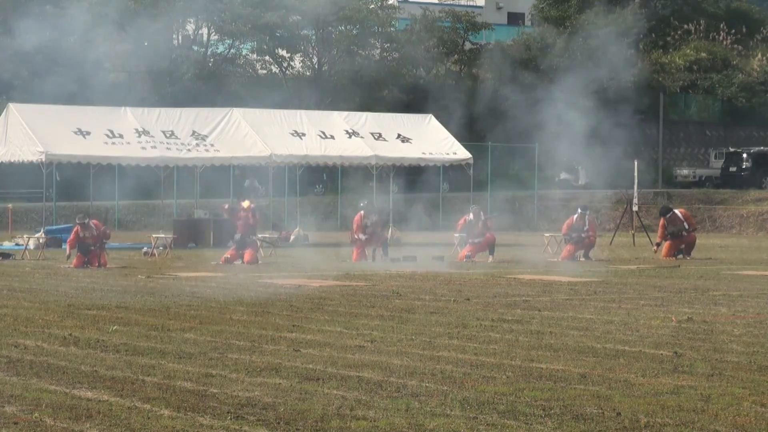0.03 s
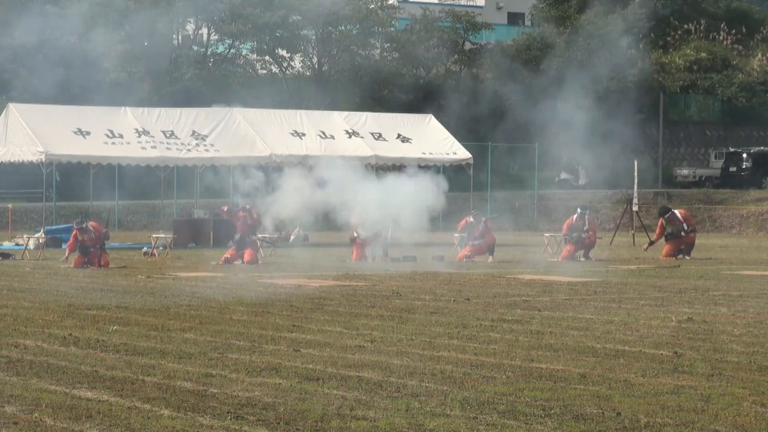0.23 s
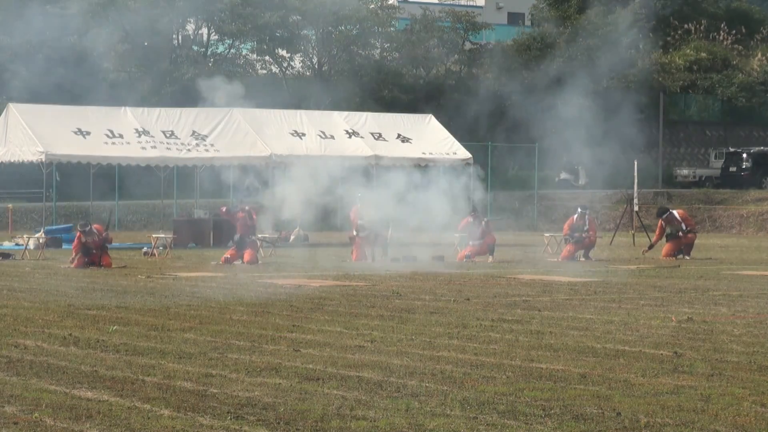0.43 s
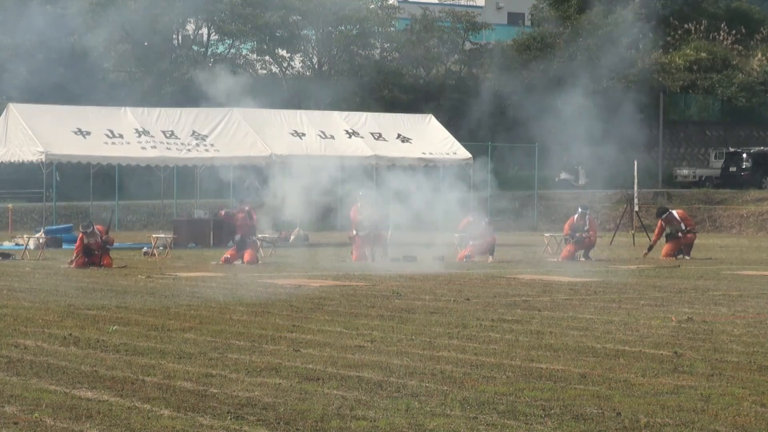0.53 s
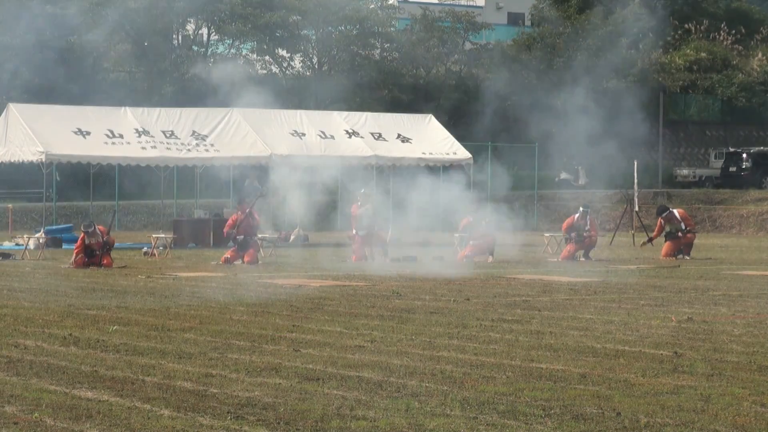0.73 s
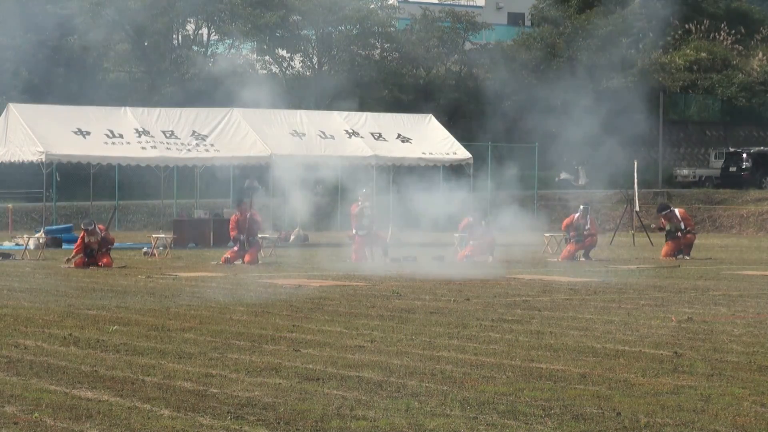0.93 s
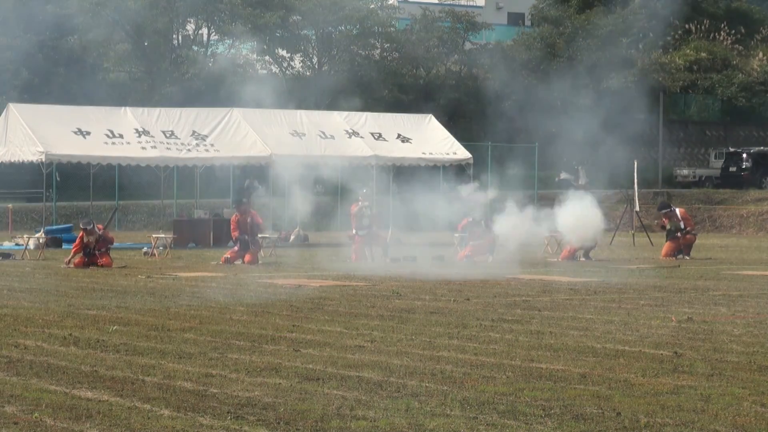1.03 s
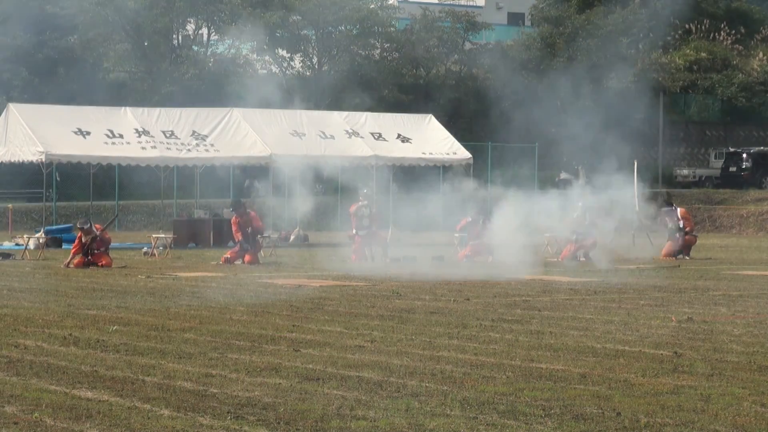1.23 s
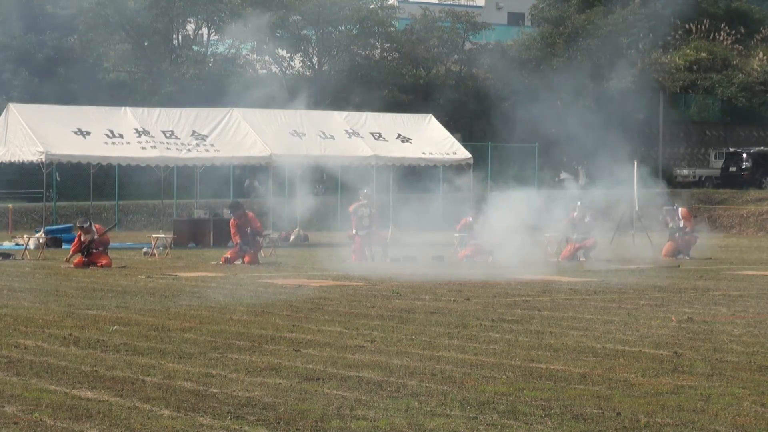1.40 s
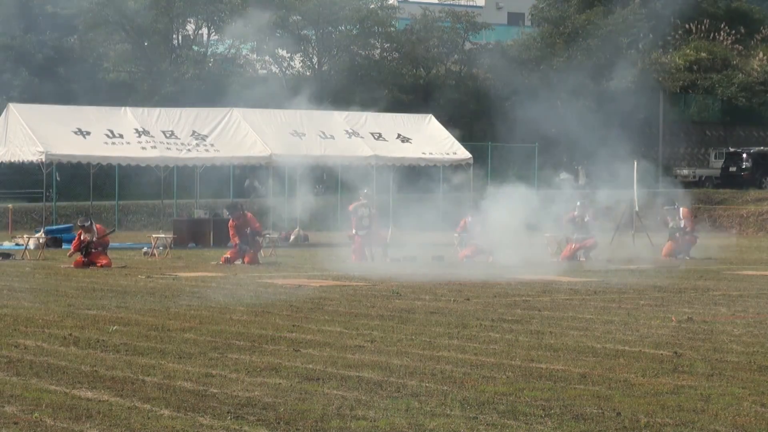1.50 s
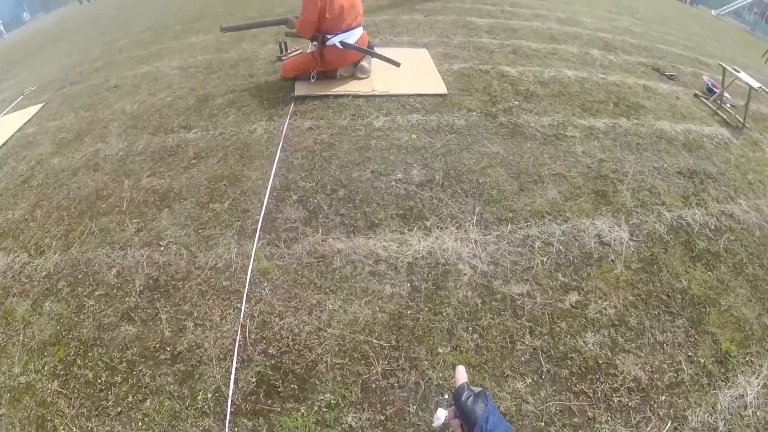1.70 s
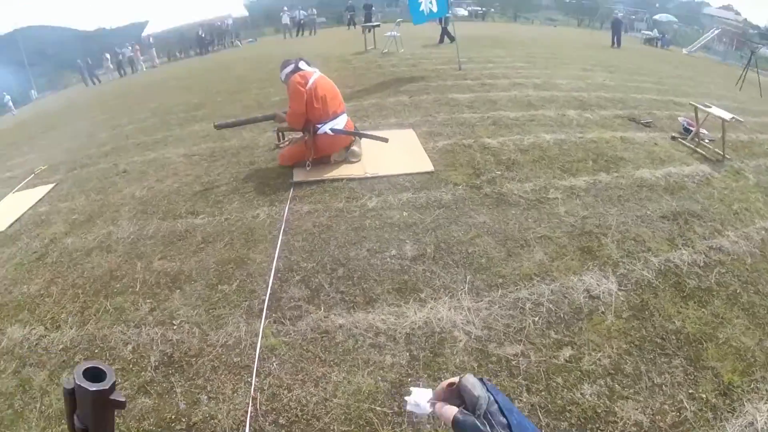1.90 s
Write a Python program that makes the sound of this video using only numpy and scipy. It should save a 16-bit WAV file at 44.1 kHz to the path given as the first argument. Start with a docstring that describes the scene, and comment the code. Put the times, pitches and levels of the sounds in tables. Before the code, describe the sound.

Two loud black-powder gunshots sound across an open field. A faint metallic click at the very start precedes the first blast at 0.2 seconds. Crackling reflections, a hard slap near 0.4 seconds and low hillside booms follow, fading toward one second. The second shot cracks at about 1.1 seconds, with slaps around 1.4 seconds and a rumbling echo dying away through 1.8 seconds over faint outdoor air.

```python
"""Two matchlock shots in a field

After a faint metallic click, two black-powder shots sound a second apart over grass. Each muzzle shock
returns as crackle from tents and fences, slaps from walls, the booms and roar of a wooded hillside and
a far rumble. A fast limiter presses blast and echoes to nearly one level."""
import sys
import numpy as np
from scipy import signal
from scipy.fft import rfft, irfft, next_fast_len
from scipy.io import wavfile
from scipy.ndimage import uniform_filter1d, map_coordinates

SR = 44100
rng = np.random.default_rng(int(sys.argv[2]) if len(sys.argv) > 2 else 0)


def to_wav(s):
    """Save 16-bit WAV."""
    ch = np.atleast_2d(s).T  # columns
    pcm = np.round(np.clip(ch, -1, 1) * 32767)  # PCM
    wavfile.write(sys.argv[1], SR, pcm.astype(np.int16))


N = 85995
T = np.arange(N) / SR

# the shots: t/s, blast level/dB, reverberation level/dB, reverberation tilt/(dB per octave)
SHOTS = [(0.1778, -3, 1.5, -0.5), (1.138, 1.5, 0, -0.81)]
# spectrum of the muzzle crack and its scattered echoes: f/Hz, level/dB
CRACK_SPECTRUM = [(300, 12), (1000, 7), (2500, 5.5), (5000, 1.5), (9000, -5.5), (12000, -13), (15000, -15)]
GRAINS_PER_S, GRAIN_SHARE = 3500, 0.41  # separate wavefronts in a grainy wash: rate, share of power


def amp(db):
    """Amplitude ratio of a level in decibels."""
    return 10 ** (np.asarray(db) / 20)


def unit(x):
    """Normalisation to rms 1."""
    return x / np.sqrt(np.mean(x ** 2) + 1e-20)


def along(points, hz):
    """Interpolation of (f/Hz, value) points on a logarithmic frequency axis."""
    f, v = np.transpose(points)
    return np.interp(np.log(hz + 1), np.log(f + 1), v)


def filtered(x, response):
    """Linear filtering: the spectrum of x times a frequency response."""
    size = next_fast_len(N + 8192)
    return irfft(rfft(x, size) * response(np.fft.rfftfreq(size, 1 / SR)), size)[..., :N]


def pan(db):
    """Left and right gains for a level difference between the ears."""
    return amp([[db / 2], [-db / 2]])


def wobble(hz):
    """Random modulation: a smooth curve through hz Gaussian values a second."""
    return map_coordinates(rng.standard_normal(1024), [T * hz], mode="wrap")


def fade(start, t60):
    """Exponential decay from start, by 60 dB in t60 seconds."""
    return (T >= start) * np.exp(-np.log(1000) * np.maximum(T - start, 0) / t60)


def scatter(spectrum, share=0., tilt_db=0.):
    """Partly coherent stereo noise of rms 1, with a share of its power in separate wavefronts."""
    # likeness of left and right: f/Hz, correlation
    coherence = [(40, 0.39), (130, 0.85), (300, 0.75), (550, 0.59), (1200, 0.59), (4500, 0.85),
                 (9000, 0.72), (13000, 0.18)]
    fronts = rng.standard_normal((2, N)) * (rng.random((2, N)) < GRAINS_PER_S / SR)
    pair = np.sqrt(share) * unit(fronts) + np.sqrt(1 - share) * rng.standard_normal((2, N))

    def response(hz):
        angle = np.arccos(np.clip(along(coherence, hz), -1, 1)) / 2
        colour = amp(along(spectrum, hz) + tilt_db * np.log2((hz + 1) / 500)) * hz / (hz + 10)
        return colour * np.array([np.cos(angle), np.sin(angle)])

    mid, side = filtered(pair, response)
    return unit(np.array([mid + side, mid - side]))


def open_air():
    """Ambient noise: a steady outdoor background, strongest in the bass."""
    # background spectrum: f/Hz, level/dB
    spectrum = [(25, 2), (60, 12), (170, 7), (370, 5.5), (500, -2), (1100, -3.5), (2300, -14.5),
                (5500, -23.5), (11000, -29.5), (15000, -29)]
    return amp(-41) * scatter(spectrum)


def clicks():
    """Impact on metal: a tick of noise and the damped free vibration of one mode."""
    # small impacts: t/s, level/dB
    impacts = [(0.0574, -37.5), (.0985, -63)]
    # tick spectrum: f/Hz, level/dB
    spectrum = [(1000, -30), (2700, -18), (3800, 9), (5000, -7), (9000, -6.5), (13000, -46)]
    ring_hz = 4000
    ticks = sum(amp(db) * fade(start, t60=0.03) for start, db in impacts) * scatter(spectrum)
    ring = sum(amp(db - 4) * fade(start, t60=0.04) * np.sin(2 * np.pi * ring_hz * (T - start))
               for start, db in impacts)
    return ticks + ring


def shock(start, length, rise=1 / SR):
    """Friedlander wave: a pressure jump that falls through zero into suction after length seconds."""
    t = np.maximum(T - start, 0)
    return (1 - np.exp(-t / rise)) * (1 - t / length) * np.exp(-t / length)


def blasts():
    """Sudden gas expansion radiates a shock, a slow pressure swing, a crack and a bark; bounces follow."""
    # reflections off the ground and things beside the gunners: delay/s, level/dB, pulse length/s
    bounces = [(.0025, 10.5, 0.00076), (0.0107, -2, 0.0013)]
    # spectrum of the muzzle's bark: f/Hz, level/dB
    bark_spectrum = [(100, -8), (400, -2), (800, 2), (1400, -16), (3000, -33), (10000, -34)]
    swing_delay_s, half_period_s = 0.00316, 0.00306
    out = np.zeros((2, N))
    for start, db, _, _ in SHOTS:
        direct = shock(start, length=0.00062)
        u = (T - start - swing_delay_s) / half_period_s
        swing = amp(-4.5) * np.sin(np.pi * u) * (u > 0) * (u < 2)  # one full cycle
        reflected = sum(amp(level) * shock(start + delay, length, rise=0.00032)
                        for delay, level, length in bounces)
        crack = amp(-13) * fade(start, t60=0.045) * scatter(CRACK_SPECTRUM, GRAIN_SHARE)
        bark = amp(-7.5) * fade(start, t60=0.037) * scatter(bark_spectrum)
        out += amp(db) * (direct + swing + reflected + crack + bark)
    return signal.sosfilt(signal.butter(2, 46, "high", fs=SR, output="sos"), out)


def echo(spectrum, level_db, pan_db, delay, rise, hold, sag, t60):
    """Diffuse reflection of each shot: it rises, sags by sag dB/s for hold seconds, then decays."""
    out = np.zeros((2, N))
    for start, _, db, tilt in SHOTS:
        t = np.maximum(T - start - delay, 0)
        release = np.exp(-np.log(1000) * np.maximum(t - hold, 0) / t60)
        envelope = np.minimum(t / rise, 1) * amp(-sag * np.minimum(t, hold)) * release
        flutter_db = 1.37 * wobble(hz=58.87)
        out += envelope * amp(level_db + db + flutter_db) * scatter(spectrum, GRAIN_SHARE, tilt)
    return out * pan(pan_db)


def roar():
    """Outdoor reverberation: the farther a region lies, the later and duller its diffuse echo."""
    # echo spectra of the near field, the trees, the hillside and far terrain: f/Hz, level/dB
    near = [(30, -19), (70, -7.5), (150, 6), (280, 6.5), (550, 3.5), (1000, -6), (2500, -12), (5000, -13),
            (9000, -19.5), (12000, -21.5), (15000, -29)]
    trees = [(30, -37), (120, -0.5), (250, -2), (400, 0.5), (650, -5.5), (1000, -16), (2500, -19),
             (5000, -22.5), (9000, -30.5), (12000, -35), (15000, -50)]
    hill = [(25, -32), (55, -19), (130, 1), (220, -7.5), (400, -7.5), (700, -14.5), (1300, -16),
            (2500, -23), (5000, -28.5), (9000, -38.5), (12000, -49), (15000, -80)]
    far = [(25, -26), (60, -10.5), (125, -3), (230, -12), (400, -11), (700, -18.5), (1400, -19),
           (3000, -26), (5500, -33.5), (9000, -46.5), (12000, -79), (15000, -85)]
    return (echo(near, level_db=-12, pan_db=5, delay=0.011, rise=0.0025, hold=0.022, sag=11, t60=0.64)
            + echo(trees, level_db=-14.5, pan_db=-3, delay=0.135, rise=0.025, hold=0.086, sag=0, t60=0.29)
            + echo(hill, level_db=-13, pan_db=-3, delay=0.18, rise=0.073, hold=0.26, sag=17.5, t60=0.33)
            + echo(far, level_db=-21.5, pan_db=1.5, delay=0.38, rise=0.1, hold=0.11, sag=28.3, t60=2.08))


def sprays():
    """Scattering by tents and fences: ragged clusters of sharp reflections, duller from farther away."""
    # clusters: t/s, level/dB, left-right/dB, tilt/(dB per octave), clipped to dull_tilt_db..0
    clusters = [(0.19, -16, -10, 4), (0.199, -15, 2, 0), (0.249, -9.5, 2, 2), (.270, -22.5, 6, 0),
                (0.3091, -14.5, 3.5, 2), (0.369, -15, -2, -1), (0.3764, -9.5, 2, -1),
                (0.528, -25.5, 10, -3), (.596, -39, 5, -8), (0.697, -18, -4, -3.5), (1.152, -15, 1, 0),
                (1.158, -15.5, -4, -.5), (1.2135, -18.5, 8, -1), (1.225, -16.5, 3, 0.5),
                (1.2747, -15, .5, 0), (1.326, -19.5, 3, -.5), (1.38, -15, -3, -2.5), (1.573, -39, 3, -10),
                (1.653, -20, -3, -2.5)]
    rise_s, dull_tilt_db = 0.0024, -3
    bright_power, dull_power = np.zeros((2, N)), np.zeros((2, N))
    for start, db, balance, tilt in clusters:
        envelope = amp(db) * pan(balance) * fade(start, t60=0.1) * np.clip((T - start) / rise_s, 0, 1)
        dullness = np.clip(tilt / dull_tilt_db, 0, 1)
        bright_power += (1 - dullness) * envelope ** 2
        dull_power += dullness * envelope ** 2
    bright = np.sqrt(bright_power) * scatter(CRACK_SPECTRUM, GRAIN_SHARE)
    dull = np.sqrt(dull_power) * scatter(CRACK_SPECTRUM, GRAIN_SHARE, dull_tilt_db)
    crackle_db = 3.1 * wobble(hz=220.1)
    return (bright + dull) * amp(crackle_db)


def booms():
    """Reflection from broad slopes spreads the blast into short swells of low, band-limited noise."""
    # returns from the slopes: t/s, level/dB, centre f/Hz
    returns = [(0.207, -20, 470), (.25, -22, 111), (0.321, -19.5, 407), (.378, -10.5, 275),
               (.400, -18, 360), (.425, -15.5, 98), (0.443, -12, 405), (0.473, -8, 133), (.60, -17.5, 197),
               (0.731, -21.5, 149), (0.836, -32, 353), (1.195, -23, 141), (1.257, -15.5, 410),
               (1.306, -15.5, 360), (1.372, -16, 94), (1.388, -17, 169), (1.43, -19, 129)]
    rise_s, width_octaves = 0.013, 0.36
    out = np.zeros(N)
    for start, db, centre in returns:
        u = np.maximum(T - start, 0) / rise_s
        envelope = u * np.exp(1 - u)
        band = lambda hz: np.exp(-.5 * (np.log2((hz + 1) / centre) / width_octaves) ** 2)
        swell = unit(envelope * filtered(rng.standard_normal(N), band))
        out += amp(db) * swell * np.sqrt(np.mean(envelope ** 2))
    return out * pan(-3)


def slaps():
    """Specular reflection: walls return the shock as a knock of a few cycles, trailed by a short wash."""
    # wall echoes: t/s, level/dB, left-right/dB, f/Hz
    wall_echoes = [(0.4123, 9, -2, 1265), (0.42, -2.5, -15.5, 1340), (.4482, 3.5, -2.5, 1100),
                   (0.55, -1.5, 2, 1100), (0.6301, -10, 5, 1460), (.812, -13, -6, 960),
                   (0.847, -16.5, 10.5, 1300), (1.3526, 2, -4, 1320), (1.358, 0.5, -11.5, 1470),
                   (1.3872, -1, -5, 1240), (1.497, -7, -2, 1150), (1.573, -8, -8, 1120),
                   (1.6551, -13.5, -6, 1040), (1.767, -20.5, 7, 1260)]
    # spectrum of the wash: f/Hz, level/dB
    wash_spectrum = [(300, -28), (700, 3.5), (1200, 1), (1700, -7), (2800, -11), (5000, -24), (10000, -47)]
    rise_s, overtone_ratio = 0.00033, 1.99
    knocks, wash_envelope = np.zeros((2, N)), np.zeros((2, N))
    for start, db, balance, hz in wall_echoes:
        t = np.maximum(T - start, 0)
        phase = 2 * np.pi * hz * t
        wave = np.sin(phase) + amp(-10) * np.sin(overtone_ratio * phase)
        envelope = (1 - np.exp(-t / rise_s)) * fade(start, t60=0.0092)
        knocks += amp(db) * pan(balance) * envelope * wave
        wash_envelope += amp(db - 22) * pan(balance) * fade(start, t60=0.049)
    return knocks + wash_envelope * scatter(wash_spectrum, GRAIN_SHARE)


def scene():
    """Superposition of the shots, their echoes, the clicks and the open air."""
    return blasts() + sprays() + slaps() + booms() + roar() + clicks() + open_air()


def record(dry):
    """Peak limiting and soft saturation, then the microphone's treble roll-off and a band limit."""
    ceiling, smoothing_s, recovery_db_per_s, top_hz = 0.59, 0.0012, 471, 16000
    roll_off = [(11500, 1), (13200, -2), (14500, -19), (16000, -34)]  # f/Hz, level/dB
    over_db = 20 * np.log10(np.maximum(np.abs(dry).max(axis=0) / ceiling, 1))
    recovery_db = recovery_db_per_s * T
    cut_db = np.maximum.accumulate(over_db + recovery_db) - recovery_db  # eases off after each peak
    limited = dry * amp(-uniform_filter1d(cut_db, int(smoothing_s * SR)))
    clipped = limited / (1 + (limited / .85) ** 8) ** (1 / 8)
    return filtered(clipped, lambda hz: amp(along(roll_off, hz)) * (hz < top_hz))


dry = scene()
out = record(dry)
to_wav(out)
```